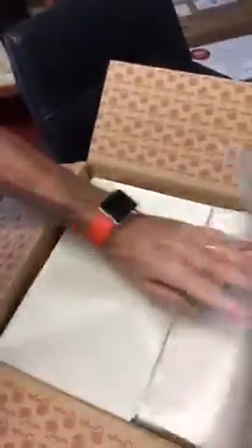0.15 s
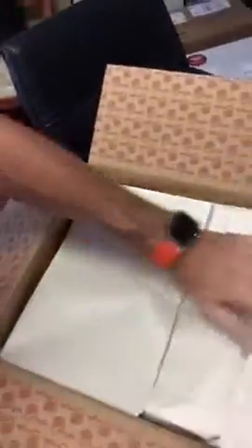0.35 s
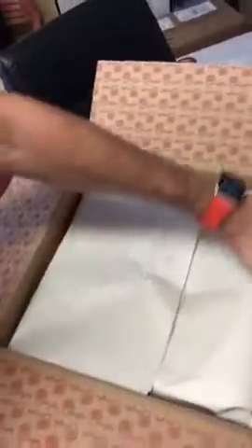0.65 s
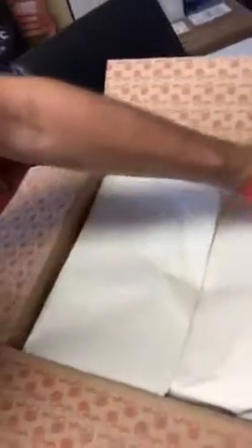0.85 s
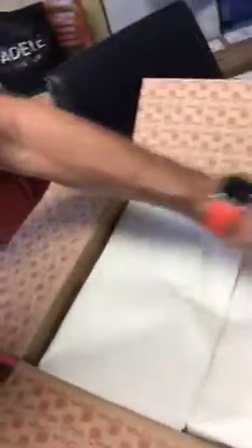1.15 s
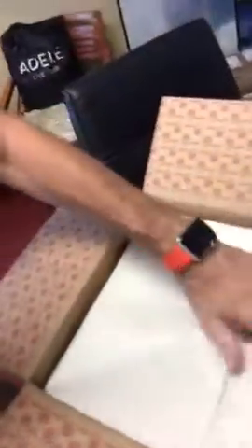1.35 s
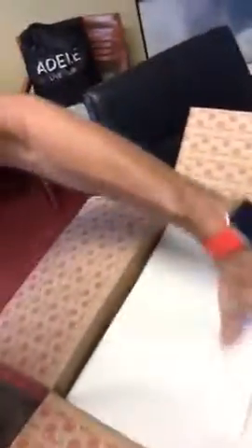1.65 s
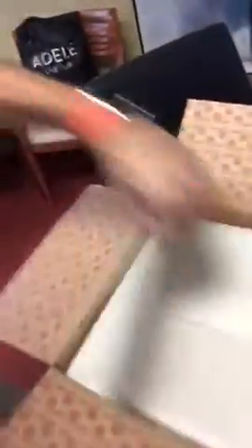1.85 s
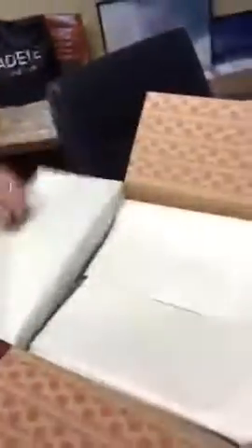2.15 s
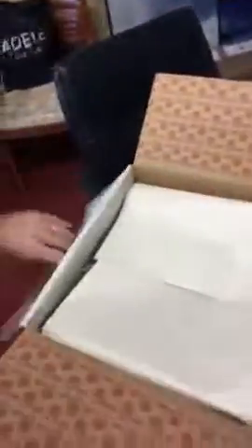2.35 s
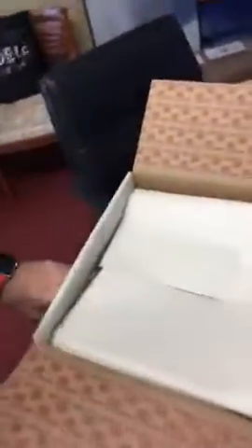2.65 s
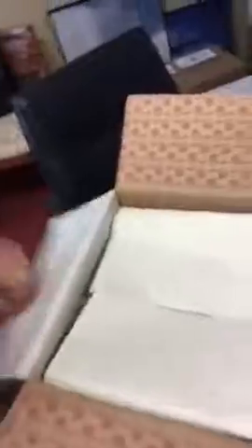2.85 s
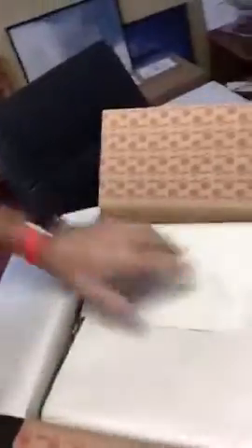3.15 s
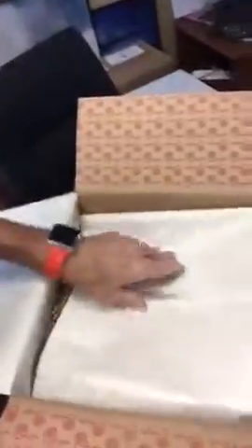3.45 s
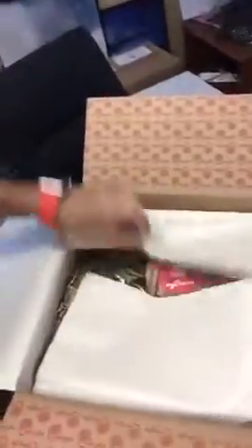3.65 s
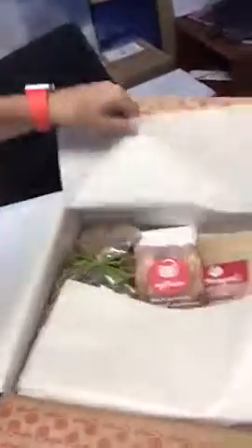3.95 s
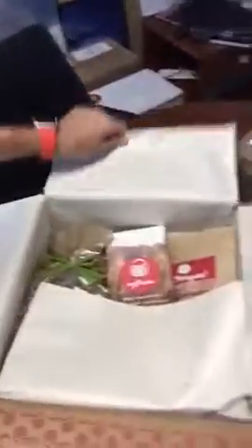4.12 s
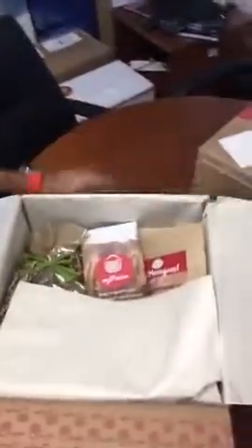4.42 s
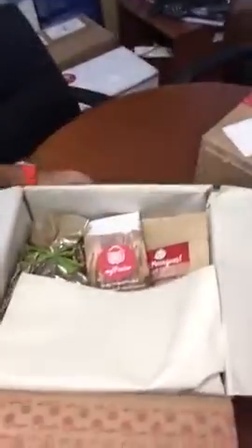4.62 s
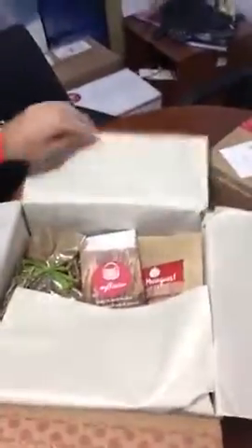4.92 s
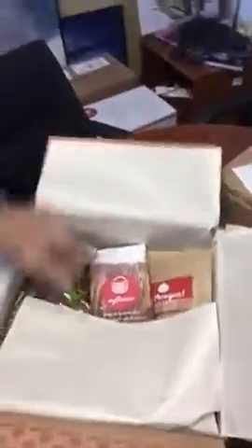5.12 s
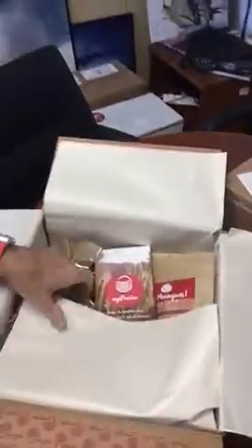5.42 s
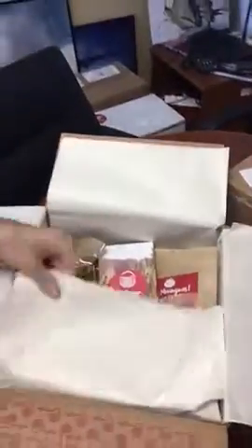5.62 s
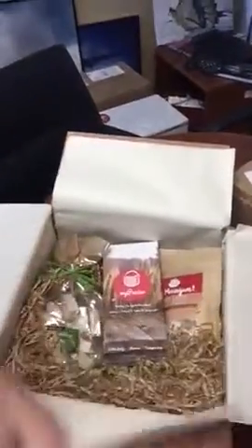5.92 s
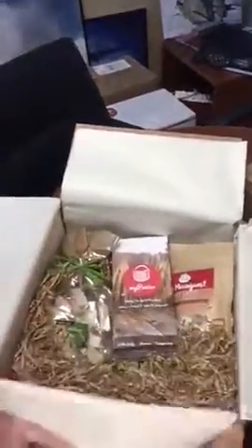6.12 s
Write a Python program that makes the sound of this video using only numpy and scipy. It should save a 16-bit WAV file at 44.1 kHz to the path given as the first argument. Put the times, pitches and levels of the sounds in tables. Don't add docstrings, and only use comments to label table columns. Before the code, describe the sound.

Short spurts of wrapping-paper crinkle, bright and brittle, with lone clicks and snaps standing out, recorded near in a quiet furnished room. Soft hand bumps and sliding strokes make the box answer with low, boxy tones, and the moving sheets fan dull air. Two side sheets first, a lull, a longer lift and fold, another lull, then a lively last sheet. Faint low room rumble and hiss stay underneath.

```python
import sys
import numpy as np
from scipy import signal
from scipy.fft import rfft, irfft
from scipy.io import wavfile

SR = 44100
rng = np.random.default_rng(int(sys.argv[2]) if len(sys.argv) > 2 else 0)


def to_wav(s):
    ch = np.atleast_2d(s).T
    pcm = np.round(np.clip(ch, -1, 1) * 32767)
    wavfile.write(sys.argv[1], SR, pcm.astype(np.int16))


def how_loud(loudness_db):
    steps = np.asarray(loudness_db, float) / 20
    return 10 ** steps


N = 276941


def rms_one(x):
    return x / np.sqrt(np.mean(x ** 2) + 1e-20)


def at_hz(points, hz):
    points = np.array(points)
    return np.interp(np.log(hz), np.log(points[:, 0]), points[:, 1])


def drift(rate_hz):
    r = np.exp(-2 * np.pi * rate_hz / SR)
    settle = 9000
    wander = signal.lfilter([1], [1, -2 * r, r * r], rng.standard_normal(N + settle))
    return rms_one(wander[settle:])


def resonate(x, hz, width_hz):
    r = np.exp(-np.pi * width_hz / SR)
    feed = np.array([1, 0, -1]) * (1 - r * r) / 2
    return signal.lfilter(feed, [1, -2 * r * np.cos(2 * np.pi * hz / SR), r * r], x)


def band(x, low_hz, high_hz):
    return signal.sosfilt(signal.butter(2, [low_hz, high_hz], "band", fs=SR, output="sos"), x)


def high_pass(x, cut_hz):
    return signal.sosfilt(signal.butter(4, cut_hz, "high", fs=SR, output="sos"), x)


def add(out, start_s, sound):
    i = max(round(start_s * SR), 0)
    out[i:i + len(sound)] += sound[:N - i]


def grains(per_s, spread_db, clumps):
    sizes = how_loud(spread_db * np.minimum(rng.exponential(1, N), 5)) * rng.choice([-1, 1], N)
    happens = rng.random(N) < per_s * clumps / SR
    return sizes * happens + 1e-18


def flurries(per_s, spread_db):
    fade = np.exp(-1 / (0.0017 * SR))
    bursts = signal.lfilter([1], [1, -fade], np.abs(grains(per_s, spread_db, 0.94)))
    thickness = 0.6 + bursts
    return thickness / thickness.mean()


def spurts(rows, lift_db):
    peak_s, rise_s, fall_s, level_db, _ = np.transpose(rows)[:, :, None]
    drop_db, bend = 20, 1.45
    t = np.arange(0, N + 32, 32) / SR
    before = (peak_s - t) / np.maximum(rise_s, 0.002)
    after = (t - peak_s) / np.maximum(fall_s, 0.002)
    away = np.where(t < peak_s, before, after)
    peak_db = level_db + np.asarray(lift_db)[:, None]
    power = how_loud(2 * (peak_db - drop_db * away ** bend)).sum(axis=0)
    return np.interp(np.arange(N) / SR, t, 10 * np.log10(power + 1e-12))


# pitch_hz [Hz], level_db [dB per Hz]
ROOM_TONE_SPECTRUM = [(30, -14), (130, 3), (178, -5), (238, -3), (344, -16), (1030, -19), (2460, -26),
                      (5500, -30.5), (15800, -39)]


def room_tone():
    hz = np.maximum(np.fft.rfftfreq(N, 1 / SR), 10)
    shaped = rfft(rng.standard_normal(N)) * how_loud(at_hz(ROOM_TONE_SPECTRUM, hz))
    return how_loud(-62) * rms_one(irfft(shaped, N))


# start_s [s], peak_db [dB], ring_hz [Hz],
# bright_edge_db [dB]
PAPER_SNAPS = [(0.1285, -25, 3780, -45), (0.1329, -30.5, 1590, -33), (0.436, -29.5, 1600, -9),
               (0.048, -45, 1840, -40), (0.5547, -22.5, 2900, -22), (0.5657, -21, 3930, -2),
               (0.6877, -35, 1600, -18), (0.7428, -14.5, 3470, -19), (0.7513, -20, 3500, -34),
               (0.7683, -23, 2870, -22), (0.7807, -22, 2220, -7), (1.052, -40.5, 2610, -32),
               (0.5378, -27, 1830, 2), (0.1125, -40, 3470, -25), (1.4129, -24, 1070, 0),
               (1.499, -27, 4230, -15), (1.5116, -23, 3400, -24), (1.6172, -20.5, 900, 2),
               (1.1173, -27, 7500, -7), (1.739, -25.5, 2440, -28), (0.46, -22.5, 3460, -27),
               (1.8209, -24, 3570, -42), (1.8505, -17, 3500, -42), (1.9835, -21.5, 3000, -34),
               (2.1422, -22, 3180, -11), (2.2584, -21, 2190, -3), (2.2818, -21, 5400, -1),
               (2.289, -24.5, 3720, -5), (2.3839, -30, 1880, -32),
               (3.355, -20, 1230, -30), (3.3612, -17.5, 1790, 0), (3.3708, -21, 1680, -33),
             (3.3777, -21, 2260, -22), (3.464, -23, 1190, -4), (3.4833, -21, 4360, 1),
             (3.507, -21, 3600, -12), (3.531, -16.5, 5930, -19), (6.0712, -23, 1360, -23),
             (3.807, -23.5, 1170, -25), (3.952, -15, 2820, -20), (4.002, -22.5, 2330, -21),
             (4.0662, -23.5, 2000, -20), (4.099, -21.5, 2800, -1), (4.1075, -20.5, 6600, -3),
             (4.235, -18, 6940, -8), (4.396, -15, 3630, 6), (4.9824, -23.5, 5770, -24),
               (5.27, -27.5, 6980, -27), (5.2998, -18.5, 3830, 0), (5.3207, -17.5, 1840, -1.5),
              (5.3625, -24, 3800, 2), (5.4104, -32, 2090, -35), (5.4494, -21, 1950, 4),
              (5.47, -24, 4570, -2), (6.1285, -17, 1330, -21), (5.599, -25.5, 3430, -1),
              (5.625, -24.5, 3900, 7), (5.651, -28.5, 4100, -8), (6.117, -28, 4330, -19),
              (5.846, -19, 2100, -7), (5.8524, -19, 3000, -15), (5.8588, -9.5, 3300, -34),
              (5.865, -13, 2220, -2), (5.931, -20.5, 2750, -5), (5.9468, -20, 3240, -38.5),
              (5.9542, -23.5, 2036, -25), (6.0081, -17.5, 5230, -1), (6.07, -19, 4150, -26),
              (6.131, -15, 3440, -25), (6.1895, -27, 5200, -16), (6.254, -35, 4830, -31.5),
               (0.2574, -37, 4350, -9.0), (0.4532, -28.5, 2200, -13), (0.521, -28, 3010.0, -5),
              (0.5696, -24.5, 1650, 7), (1.3788, -37, 2710.0, -26), (1.418, -23, 1000, 2),
              (1.4415, -32, 2500.0, -4), (1.6671, -28, 4300, -7), (1.686, -37, 1240, -12.0),
              (1.7095, -31.5, 3230.0, 2), (1.746, -23.5, 3470, -24), (1.766, -37, 3340.0, -17),
              (1.8174, -24, 2330, -25), (1.8597, -24, 2880, -23), (1.919, -37, 5790.0, -6),
              (5.2065, -50.5, 1500, -6), (2.0887, -28, 4010.0, 7), (2.1162, -30, 4310.0, -4),
              (2.2457, -40, 3380.0, -10), (2.2617, -34, 4360, -14), (2.3222, -37, 5810.0, -6),
              (2.3337, -38, 3810.0, -9.0), (2.3892, -28, 2030, 0), (2.4006, -37, 2020.0, -18),
              (2.7258, -53, 1510.0, -24), (6.041, -38, 1500, -30), (3.0593, -33.5, 3820, -24),
              (5.221, -58, 3300, 8),
               (3.3572, -17.5, 1970, -18), (3.393, -27, 970, -13), (3.404, -28, 2440, -3),
             (3.458, -28, 1260, -18), (3.513, -27, 1550, -11), (3.522, -26, 2100, -14),
             (3.546, -28, 3790, -5.0), (3.568, -37, 3660, -10.0), (3.6102, -28, 7000, 8),
             (3.614, -30, 3320.0, -13), (3.6295, -25, 4000, -13), (3.6463, -25, 2000, -13),
             (3.656, -25, 1090, -10), (3.663, -28, 4330, -6.0), (3.683, -23, 3970, -9.0),
             (3.6926, -22, 2090.0, -1), (3.709, -28, 2380, -2), (3.714, -18, 3740, -13),
             (3.749, -22, 5470, -1), (3.7626, -18, 2090, -3), (4.0147, -23.5, 1740, -21),
             (4.049, -30, 2760.0, -15), (4.082, -25, 2680, -5), (4.4326, -22.5, 5600, -5),
             (4.9914, -35, 2990.0, -18), (5.273, -30, 2480, 7), (5.278, -31, 3000.0, 12),
             (5.295, -21, 3920, -7), (5.379, -34, 1570.0, -1), (5.386, -30, 1570, -21),
             (5.388, -27.5, 1080, -1), (5.42, -27, 1960.0, -12), (5.462, -29, 4000.0, -8.0),
             (5.477, -38, 2630.0, -14), (5.506, -35.5, 1580, -15), (5.582, -43, 4390.0, -11),
             (5.592, -33, 4330, -16), (5.645, -31.5, 1760, -8), (5.7304, -19.5, 2780.0, -29),
             (5.747, -22, 1410, -7), (5.761, -20.5, 2380, -15), (5.7868, -23, 2050.0, -17.0),
             (5.7904, -30.0, 2410.0, -6), (5.8022, -23.5, 1710, -15), (5.8781, -30, 3010.0, -9),
             (6.026, -33, 2500, -9), (6.1029, -29, 1550.0, -4), (6.144, -22.5, 5460, -37)]


def crease_snaps():
    out, t = np.zeros(N), np.arange(600) / SR
    rows = PAPER_SNAPS
    lead_s, swell_s, die_s = 0.002, 0.0005, 0.0013
    swell = np.exp(-np.maximum(lead_s - t, 0) / swell_s - np.maximum(t - lead_s, 0) / die_s)
    flip = 4.15 * (np.abs(t - lead_s) < 0.5 / SR)
    for (start_s, peak_db, hz, edge_db), noise in zip(rows, rng.standard_normal((len(rows), 600))):
        burst = (noise + flip) * swell
        rustle = noise[::-1] * swell
        ring = rms_one(resonate(burst, hz, hz / 11.5))
        low_ring = rms_one(resonate(rustle, hz * 0.37 + 500, 800))
        broad = rms_one(band(burst, max(hz * 0.12, 900), min(hz * 1.66, 8000)))
        body = ring + 0.35 * low_ring + 0.5 * broad
        pop = rms_one(body) + how_loud(edge_db) * rms_one(band(rustle, 3000, 12800))
        add(out, start_s - lead_s, how_loud(peak_db + 0.5) * pop / np.abs(pop).max())
    return high_pass(out, 720)


# fade_s [s], air_push_db [dB]
BOX_BUMPS = [(0.124, -49.5, 261, 0.16, -61), (0.55, -38, 150, 0.096, -42.5), (0.741, -36, 884, 0.13, -46),
             (0.813, -44, 265, 0.064, -62), (1.105, -38.5, 915, 0.044, -45),
             (1.377, -39.5, 348, 0.067, -55), (1.608, -37, 330, 0.056, -56), (2.26, -28.5, 211, 0.091, -42),
             (2.363, -43.5, 372, 0.11, -43.5), (2.977, -53.5, 214, 0.41, -79),
             (3.138, -42, 560, 0.041, -85), (3.135, -40, 1250, 0.035, -85), (3.352, -35.5, 257, 0.15, -48),
             (4.033, -27.5, 277, 0.038, -66), (4.211, -36.5, 198, 0.089, -43.5),
             (4.354, -39, 865, 0.092, -44.5), (4.859, -37, 830, 0.037, -64), (4.049, -54, 342, 0.28, -52),
             (6.0724, -23, 293, 0.026, -41)]


def box_bumps():
    out, t = np.zeros(N), np.arange(8000) / SR
    noises = rng.standard_normal((len(BOX_BUMPS), 8000))
    for (start_s, peak_db, hz, fade_s, air_db), noise in zip(BOX_BUMPS, noises):
        fade = (1 - np.exp(-t / 0.00025)) * how_loud(-60 * t / max(fade_s, 0.02))
        tone = np.sin(2 * np.pi * hz * t)
        overtone = 0.19 * (hz < 500) * np.sin(2 * np.pi * 2.3 * hz * t)
        rough = 0.6 * rms_one(band(noise, hz * 0.96, hz * 1.92))
        puff = (1 - np.exp(-t / 0.025)) * np.exp(-t / 0.028)
        air = rms_one(band(noise, 40, 135)) * puff
        add(out, start_s, how_loud(peak_db) * fade * (tone + overtone + rough) + how_loud(air_db + 6.5) * air)
    return out


# pitch_hz [Hz], level_db [dB per Hz]
PAPER_SPECTRUM = [(590, -34), (1000, 1), (1780, -6), (2090, -1), (2550, 5), (3360, -7.5), (4330, -3),
                  (4810, -15.5), (6060, -5.5), (10400, 2), (11800, 0.5), (13400, -12), (15800, 15)]


def crackle(level_db, low_hz, high_hz, per_s, cycles, clumps, spread_db):
    clicks = grains(per_s, spread_db, clumps)
    dealt = rng.integers(0, 10, N)
    rings = np.zeros(N)
    for k, hz in enumerate(np.geomspace(low_hz, high_hz, 10)):
        ring = rms_one(resonate(clicks * (dealt == k), hz, hz / cycles))
        colour = how_loud(at_hz(PAPER_SPECTRUM, hz)) * np.sqrt(hz / cycles)
        rings += colour * how_loud(3.7 * drift(17.3)) * ring
    return how_loud(level_db) * rms_one(band(rings, low_hz * 0.94, high_hz * 0.89))


def waft(creases_db):
    return how_loud(creases_db - 18) * rms_one(band(rng.standard_normal(N), 47, 305))


# peak_s [s], rise_s [s], fall_s [s], level_db [dB], small_db [dB]
RIGHT_SHEET = [(.127, 0.0044, 0.035, -52, -14), (.22, 0.05, 0.096, -50.5, -2.5),
               (.43, 0.061, 0.42, -54.5, 5), (.571, 0.11, 0.044, -38.5, -3), (.72, 0.084, .05, -57.5, -2),
               (.743, 0.0097, 0.068, -37.5, -10), (.786, 0.067, 0.035, -39.5, -2.5),
               (.86, .05, .06, -63, -1), (.915, .05, .07, -61, -2), (1.0, .04, .05, -61, -2),
               (1.065, .05, .05, -57, 2), (1.113, 0.015, 0.025, -43, 4), (1.147, .02, .03, -57, -2)]
# peak_s [s], rise_s [s], fall_s [s], level_db [dB], small_db [dB]
LEFT_SHEET = [(1.379, 0.002, .1, -43.5, -0.5), (1.403, 0.025, 0.13, -40.5, 0),
              (1.604, 0.047, .18, -47.5, 2.5), (1.748, 0.066, 0.057, -45, 0),
              (1.816, 0.0084, 0.12, -33, -15), (1.821, .008, .01, -35, 2), (1.872, 0.062, 0.12, -42.5, 8),
              (1.981, .012, .012, -37, 2), (2.03, 0.22, 0.12, -43.5, 1.5), (2.11, 0.052, 0.11, -41, 3.5),
              (2.231, 0.26, 0.033, -45, -6), (2.265, .05, 0.03, -46.5, 8.5), (2.399, 0.15, 0.056, -47, 0.5),
              (2.6, 0.27, 0.56, -72, -3), (2.719, 0.1, 0.061, -59.5, -8)]
# peak_s [s], rise_s [s], fall_s [s], level_db [dB], small_db [dB]
FAR_LIFT = [
    (3.027, 0.098, 0.16, -57, 6),
    (3.141, 0.0028, 0.072, -61, -26),
    (3.247, 0.026, 0.065, -55, -11.5),
    (3.329, 0.0076, 0.28, -39, -21),
    (3.352, 0.027, 0.21, -41.5, 4.5),
    (3.48, 0.063, 0.18, -42, 1),
    (3.615, 0.039, 0.046, -48, 11),
    (3.73, 0.19, 0.062, -36.5, 1.5),
]
# peak_s [s], rise_s [s], fall_s [s], level_db [dB], small_db [dB]
FAR_FOLD = [
    (3.835, 0.085, 0.048, -40, -2),
    (3.92, 0.088, 0.2, -42, 1),
    (4.07, 0.21, 0.19, -42, 1.5),
    (4.58, 0.12, 0.27, -74, 4),
    (4.25, 0.085, 0.059, -51.5, 6.5),
    (4.361, 0.022, 0.12, -41, 1),
    (4.424, 0.16, 0.057, -38.5, -2),
    (4.715, 0.029, 0.05, -58.5, -9),
    (4.863, 0.03, 0.077, -41.5, -2),
    (4.987, 0.15, 0.017, -48.5, 1.5),
]
# peak_s [s], rise_s [s], fall_s [s], level_db [dB], small_db [dB]
NEAR_SHEET = [(5.266, 0.0013, 0.065, -45, 1), (5.294, 0.012, 0.031, -39, -1.5),
              (5.45, 0.11, 0.054, -42.5, -0.5), (5.535, 0.021, 0.025, -46, -3),
              (5.57, 0.35, 0.19, -61.5, 0), (5.724, 0.11, 0.1, -41.5, -5.5),
              (5.747, 0.021, 0.057, -34.5, -1), (5.862, 0.022, 0.028, -38.5, 6),
              (5.803, 0.024, 0.063, -38, -2.5), (5.94, 0.053, 0.081, -37.5, 0),
              (6.086, 0.065, 0.3, -48.5, -1), (6.131, 0.02, 0.047, -37.5, 2),
              (6.275, 0.056, 0.076, -62, 6.5)]
CRINKLE_DB = [
    -3,
    -6,
    -5.5,
    0,
    -6.5,
]


def moving_sheets(clumps):
    sheets = [RIGHT_SHEET, LEFT_SHEET, FAR_LIFT, FAR_FOLD, NEAR_SHEET]
    moves = np.vstack(sheets)
    small_db = moves[:, -1]
    fine_db = np.repeat(CRINKLE_DB, [len(sheet) for sheet in sheets])
    folds_db = spurts(moves, 0 * small_db)
    creases_db = spurts(moves, small_db)
    crinkle_db = spurts(moves, fine_db + 0.84 * small_db)
    folds = crackle(folds_db, 912, 3125, 5000, 1.3, clumps, 1.6)
    creases = crackle(creases_db, 3020, 7120, 8200, 9.3, clumps, 1.6)
    crinkle = crackle(crinkle_db, 5530, 14820, 12000, 2.3, clumps, 0.48)
    return folds + creases + crinkle + waft(creases_db)


def box(x, modes):
    return sum(how_loud(db) * resonate(resonate(x, hz, 2 * width), hz, width) for hz, width, db in modes)


def rubbing(level_db, modes, clumps):
    slips = grains(2000, 3.5, clumps)
    return box(how_loud(level_db) * slips, modes) / box(slips, modes).std()


# pitch_hz [Hz], width_hz [Hz], level_db [dB]
PANELS = [
    (229.7, 29, 4),
    (330, 84, 6.5),
    (378, 98, 3),
    (468.5, 61, 2),
]
# pitch_hz [Hz], width_hz [Hz], level_db [dB]
HOLLOW = [
    (690, 148, 7),
    (842, 79, 11),
    (956, 112, 9),
    (1609, 182, 4.5),
    (2220, 26, -16),
]
# peak_s [s], rise_s [s], fall_s [s], level_db [dB],
# hollow_over_panels_db [dB]
CARD_RUBS = [(.22, 0.084, 0.13, -55, -4.5), (.571, 0.06, 0.1, -50.5, 5.5), (.65, 0.28, 0.057, -49, -5),
             (.743, 0.0052, 0.3, -62, -4.5), (.786, 0.052, 0.028, -46, 3), (1.06, 0.065, 0.043, -63.5, -20),
             (1.113, 0.014, 0.031, -43, 3.5), (1.381, 0.0045, 0.24, -48.5, 0),
             (1.41, 0.034, 0.023, -42, -5), (1.606, 0.071, 0.35, -56.5, -2), (1.816, 0.0081, 0.37, -53, 1),
             (2.151, 0.067, 0.18, -54, -1), (2.266, 0.031, 0.066, -43.5, -4.5),
             (2.399, 0.041, 0.092, -50, -4), (2.735, 0.15, 0.035, -61, 9.5),
             (3.028, 0.18, 0.23, -67.5, 2), (3.14, .005, 0.058, -53, 2), (3.245, 0.032, 0.05, -58.5, 8),
            (3.329, 0.017, 0.23, -44.5, 0), (3.46, 0.093, 0.16, -44.5, 0), (3.73, 0.16, 0.065, -48, 7.5),
            (3.835, 0.067, 0.23, -56.5, -4), (4.05, 0.041, 0.11, -44, -7), (4.15, 0.12, 0.18, -53, 1),
            (4.36, 0.094, 0.061, -43, -1), (4.433, 0.13, 0.035, -38, 0.5), (4.861, 0.0062, 0.051, -39, -2),
            (4.989, 0.14, 0.031, -52, -3.5), (5.266, 0.0028, 0.07, -48.5, 2.5),
            (5.294, 0.025, 0.036, -44, -22), (5.448, 0.17, 0.058, -48.5, -8), (5.724, 0.057, 0.1, -45, 4),
            (5.53, 0.021, 0.051, -54.5, -7), (5.76, .05, 0.37, -52.5, 4), (5.942, 0.026, 0.049, -45.5, -1),
            (6.086, 0.012, 0.087, -46.5, -27), (6.132, 0.02, 0.042, -56.5, 15.5)]


def box_rubs(clumps):
    rubs = np.array(CARD_RUBS)
    hollow_db = rubs[:, -1]
    panels = rubbing(spurts(rubs, 0 * hollow_db), PANELS, clumps)
    return panels + rubbing(spurts(rubs, hollow_db), HOLLOW, clumps)


# middle_s [s], peak_db [dB], pitch_hz [Hz], length_s [s]
BOX_HUMS = [(0.437, -49, 335, 0.033), (2.753, -58, 690, 0.05), (2.885, -54.5, 149, 0.096),
            (4.221, -31.5, 250, .03), (4.264, -36, 315, 0.017), (4.308, -40, 945, 0.061),
            (4.385, -34, 934, .03), (.56, -41, 368, 0.061), (.565, -38.5, 1583, 0.05),
            (0.608, -41.5, 916, .055), (.62, -44, 280, 0.072), (0.648, -47, 700, 0.037),
            (.745, -34.5, 1100, 0.013), (.75, -41, 268, .03), (0.767, -35, 857, 0.027),
            (0.783, -34, 912, 0.034), (1.002, -48.5, 940, 0.021), (1.055, -52, 306, .025),
            (1.11, -41, 990, 0.025), (1.12, -43, 309, 0.023), (1.12, -43, 2216, 0.026),
            (1.127, -37, 890, 0.013), (1.149, -49, 1580, 0.019), (1.15, -47.5, 934, .025),
            (2.267, -36, 424, 0.023), (2.304, -50, 407, 0.026), (2.411, -44, 490, .025),
            (3.15, -57, 793, 0.033), (3.024, -59, 719, 0.11), (3.245, -47, 957, 0.044),
            (3.246, -55, 1600, 0.03), (4.053, -33, 348, 0.039), (4.114, -41.5, 952, 0.04),
            (4.141, -42, 333, 0.089), (4.36, -30.5, 872, 0.03), (4.371, -34, 378, .065),
            (4.429, -30.5, 990, 0.071), (4.435, -41, 327, 0.073), (4.719, -56, 1016, 0.03),
            (4.868, -31.5, 896, 0.034), (4.863, -35.5, 303, 0.033), (4.905, -41, 320, 0.043)]


def box_hums():
    out = np.zeros(N)
    noises = rng.standard_normal((len(BOX_HUMS), 8000))
    for (middle_s, peak_db, hz, length_s), noise in zip(BOX_HUMS, noises):
        t = np.arange(min(round(length_s * SR), 8000)) / SR
        wobble = 0.31 * rms_one(resonate(noise, hz, hz / 3.8))[:len(t)]
        tone = np.sin(2 * np.pi * hz * t) + wobble
        swell = np.sin(np.pi * t / length_s) ** 2
        add(out, middle_s - length_s / 2, how_loud(peak_db) * swell * tone)
    return out


def room(x):
    fade_s, wall_cut_hz = 0.19, 4300
    t = np.arange(round(0.5 * SR)) / SR
    dull = np.exp(-2 * np.pi * wall_cut_hz / SR)
    tail = signal.lfilter([1], [1, -dull], rng.standard_normal(len(t)))
    tail = tail * how_loud(-60 * t / fade_s) * (t > 0.004)
    return signal.fftconvolve(x, tail / np.linalg.norm(tail))[:N]


def scene():
    clumps = flurries(200, 2.0)
    near = crease_snaps() + box_bumps() + moving_sheets(clumps) + box_rubs(clumps) + box_hums()
    return (room_tone() + near + how_loud(-19.5) * room(near))[None]


def roll_off(x):
    return signal.sosfilt(signal.butter(12, 16850, fs=SR, output="sos"), x)


# pitch_hz [Hz], width_hz [Hz], depth [0-1]
MIC_NOTCH = (10580, 2100, 0.54)


def record(dry):
    hz, width_hz, depth = MIC_NOTCH
    x = dry - depth * resonate(dry, hz, width_hz)
    x = high_pass(x, 48)
    x = signal.sosfilt(signal.cheby2(18, 45, 16130, fs=SR, output="sos"), x)
    return roll_off(x)


dry = scene()
out = record(dry)
to_wav(out)
```